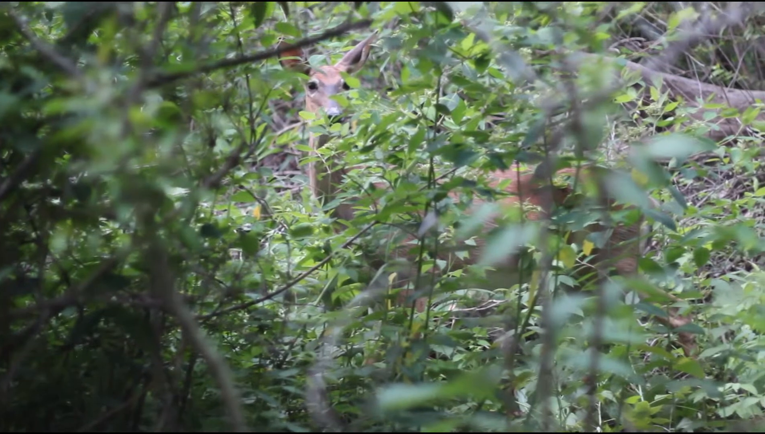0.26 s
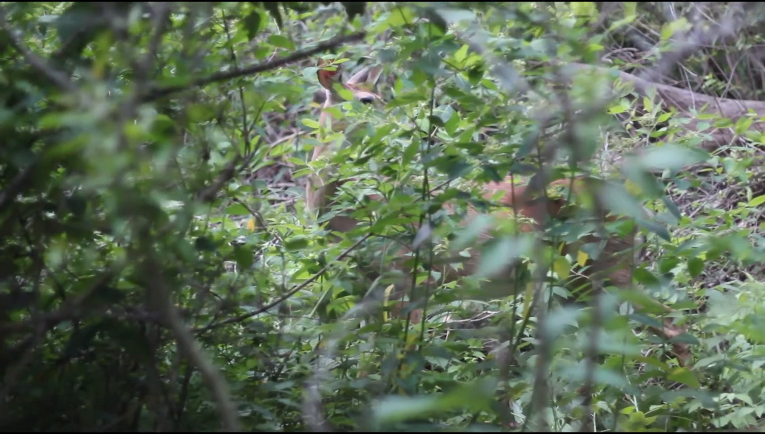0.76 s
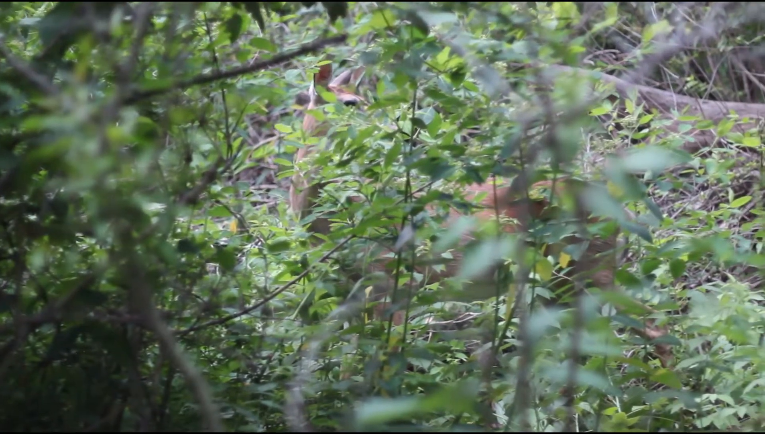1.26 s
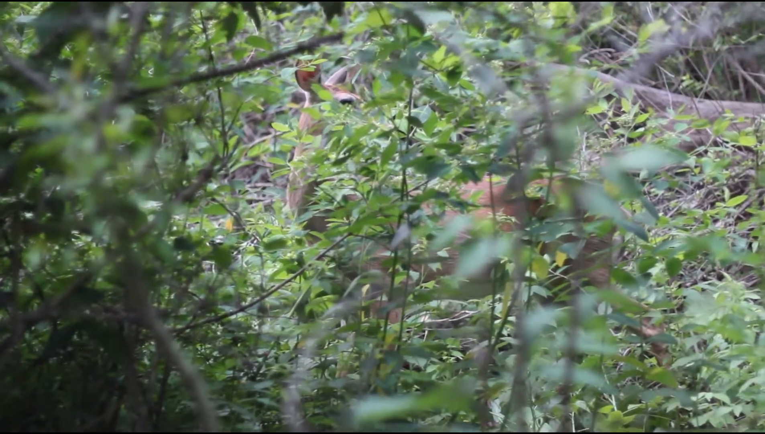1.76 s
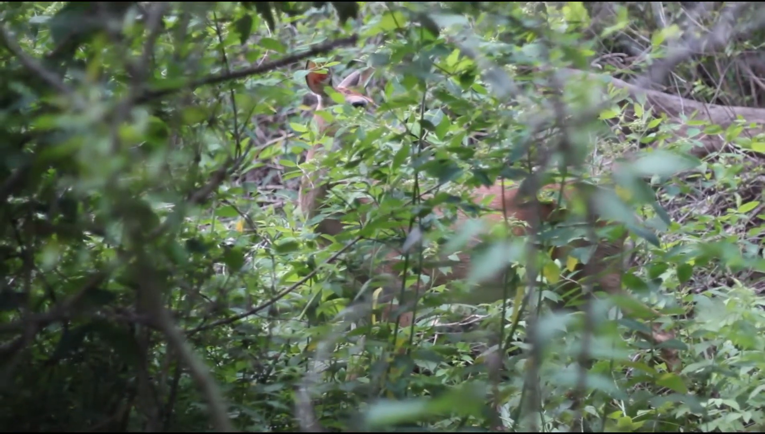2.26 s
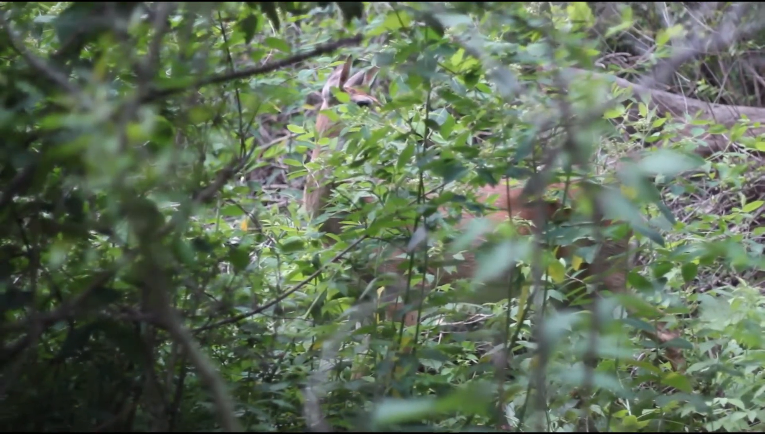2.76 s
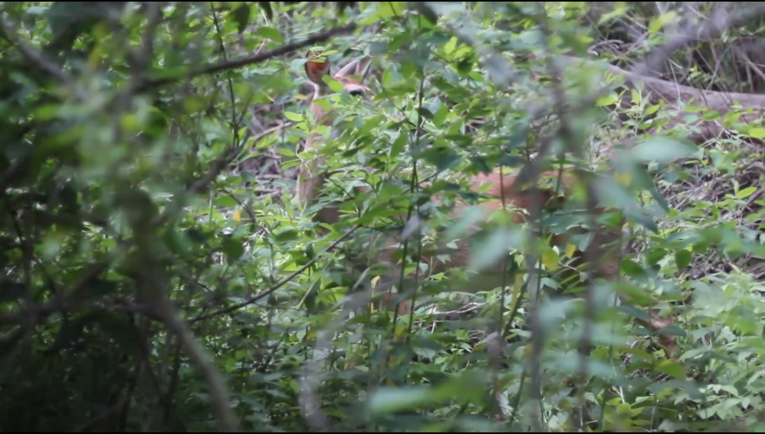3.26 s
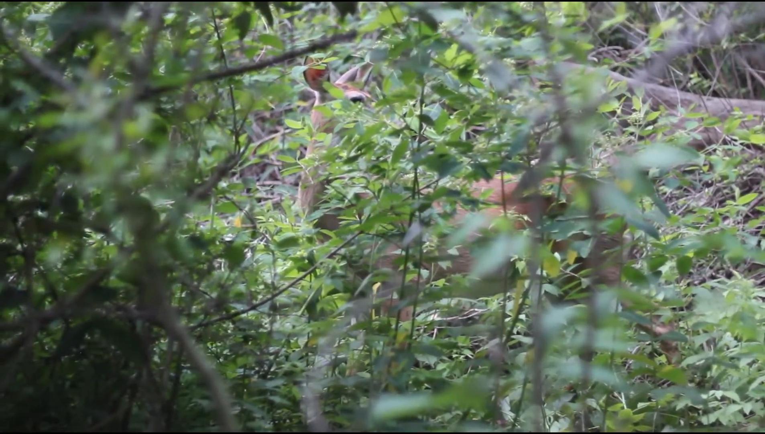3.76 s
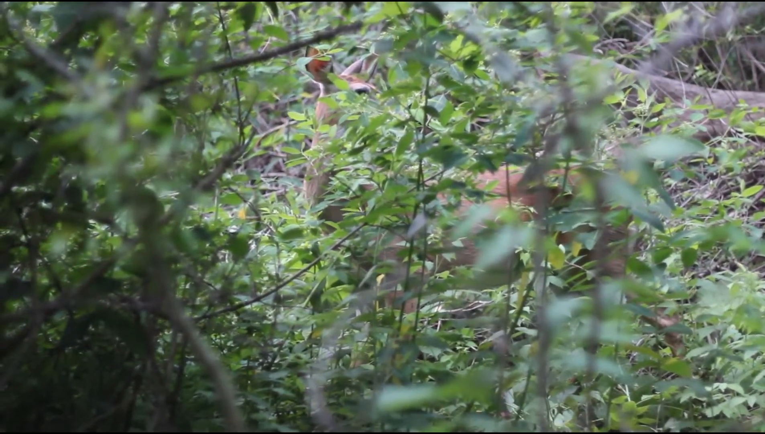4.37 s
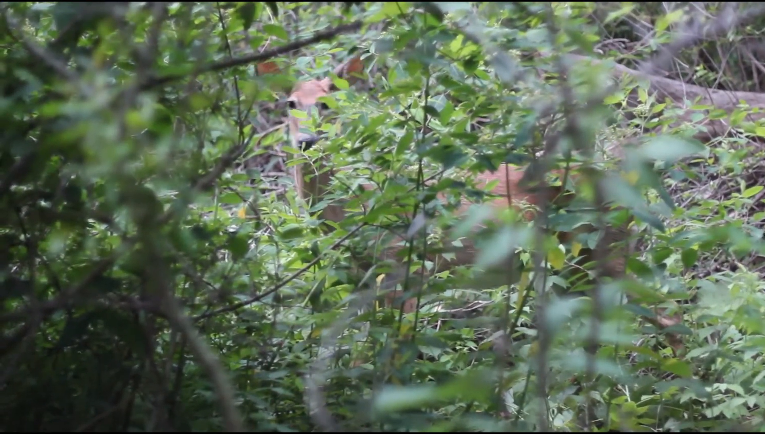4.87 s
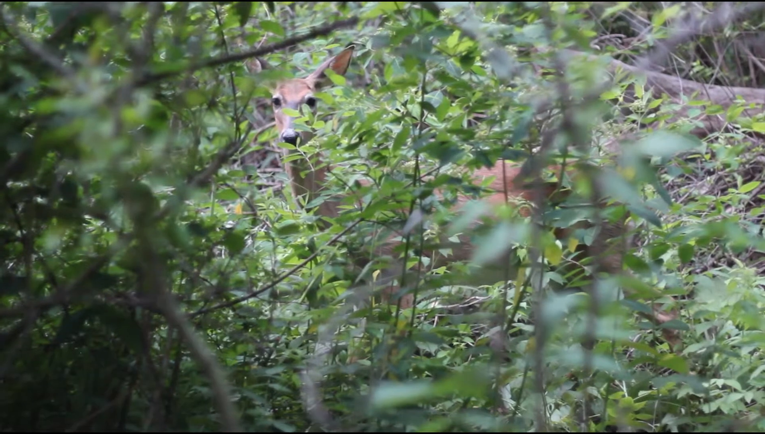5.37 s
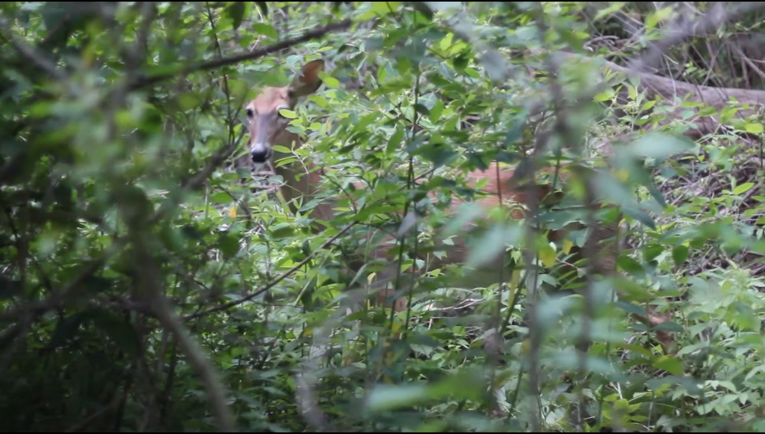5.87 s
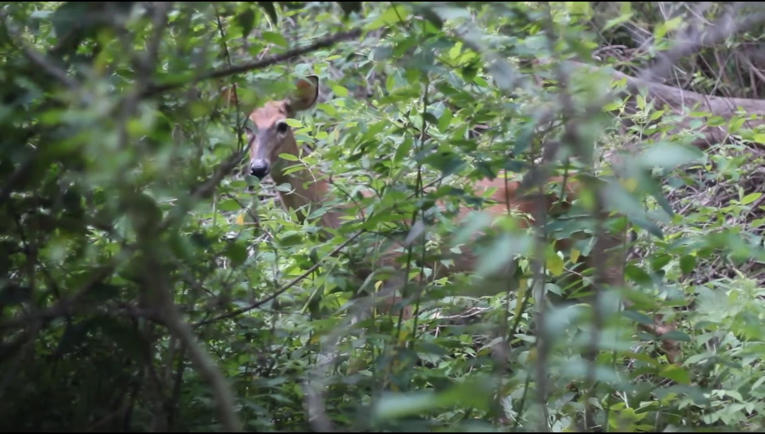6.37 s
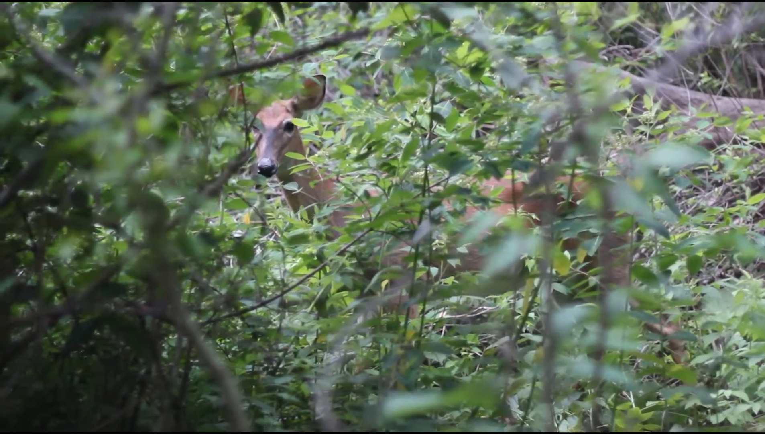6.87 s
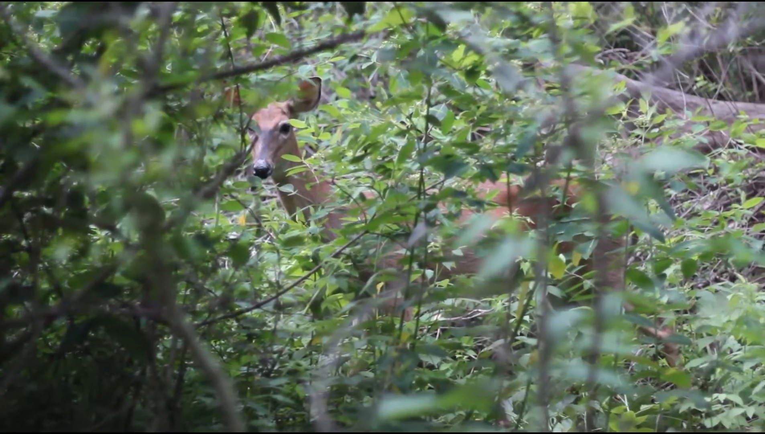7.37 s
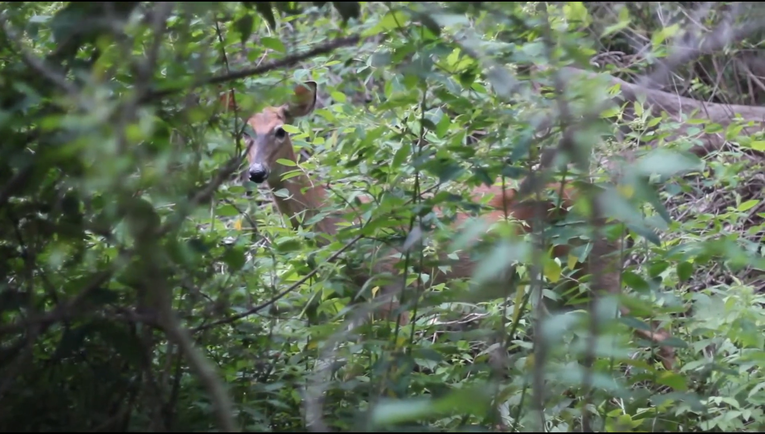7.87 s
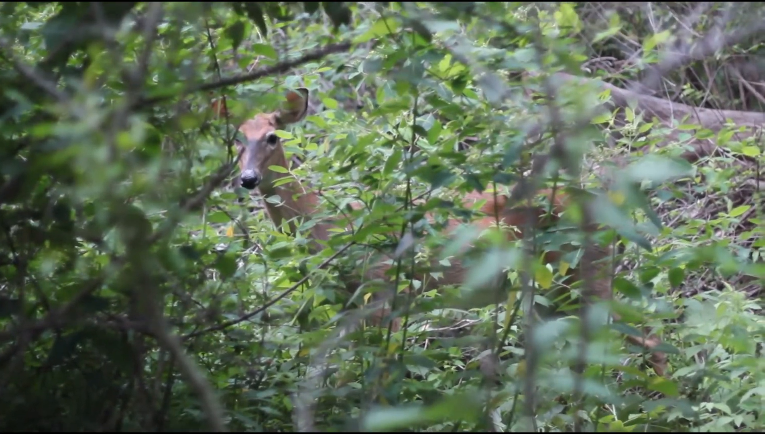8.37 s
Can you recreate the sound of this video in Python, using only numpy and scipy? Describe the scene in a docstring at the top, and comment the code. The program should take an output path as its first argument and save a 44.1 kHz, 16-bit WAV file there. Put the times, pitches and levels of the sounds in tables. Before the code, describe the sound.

In a wood, heard in stereo over a constant hiss, birds call with quick whistled notes and longer, slightly raspy trills. A few tiny twig ticks and a very faint dove coo lie under the first half. One bird mews at the busiest point and again later. After a short lull the song returns more quietly, while leaves rustle softly and a far vehicle adds a faint rush.

```python
"""Birds in a leafy wood

Songbirds whistle rising notes and buzzy trills, with breath rasping in their throats. One bird mews
through a stack of overtones and a dove coos far off; trunks and leaves scatter their voices. Behind
them lie a far chorus, rustling leaves, twig ticks, hiss, faint hum, a low rumble and a distant vehicle
that draws near. We listen through two crossed microphones."""
import sys
import numpy as np
from scipy import signal
from scipy.fft import rfft, irfft, next_fast_len
from scipy.io import wavfile

SR = 44100
rng = np.random.default_rng(int(sys.argv[2]) if len(sys.argv) > 2 else 0)


def persist_wave(psi):
    """Save psi, clipped to +-1, as 16-bit WAV."""
    counts = np.round(np.clip(psi, -1, 1) * 32767).astype(np.int16)
    wavfile.write(sys.argv[1], SR, np.atleast_2d(counts).T)


N = 379681

# The tone colour of each noise. Each row: frequency in Hz, relative level in dB.
HISS_SPECTRUM = [(15, -57), (40, -27), (75, -38), (110, -25), (170, -22.5), (330, -18), (550, -9.5),
                 (1400, -10), (2200, -9), (5000, -5.5), (10000, -5.5), (15600, -11.5)]
RUMBLE_SPECTRUM = [(20, -24), (45, -17), (70, -12.5), (110, -23.5), (160, -2.5), (260, -2),
                   (400, -13.5), (800, -54)]
VEHICLE_SPECTRUM = [(30, -58), (100, -53), (250, -21.5), (450, -4.5), (700, 3), (1050, 1.5), (1400, -5),
                    (2000, -13), (6000, -46)]
LEAVES_SPECTRUM = [(200, -63), (1500, -29), (4000, -9), (7000, -2), (10000, 0.5), (13000, -3.5),
                   (16000, -43)]
CHORUS_SPECTRUM = [(400, -65), (1300, -16.5), (1800, -9), (2050, -3.5), (2400, -3.5), (3300, -3),
                   (4400, -7), (5500, -15), (8000, -31)]
LOW_RASP_SPECTRUM = [(600, -79), (1600, -13.5), (2000, -2), (2600, 1), (3600, 1), (4300, 2.5), (4900, -8),
                     (5600, -25), (9000, -52)]
HIGH_RASP_SPECTRUM = [(1000, -64), (4000, -17), (5000, -2), (6500, -3.5), (8000, -12.5), (9500, -32)]
# How the background sounds rise and fall. Each row: time in seconds, level in dB.
VEHICLE_LEVELS = [(0, -100), (.8, -78), (3.1, -70), (5.3, -67), (5.78, -58.5), (8.61, -59)]
LEAVES_LEVELS = [(0, -52), (.6, -53.5), (1.29, -61), (1.73, -56), (2.2, -57), (3.9, -61.5), (5.3, -81),
                 (5.6, -58), (6.7, -56.5), (8.61, -65)]
CHORUS_LEVELS = [(0, -51), (.6, -46.5), (1.7, -50.5), (2.3, -55.5), (3.4, -57.5), (4.7, -51.5), (5.1, -54),
                 (5.45, -58), (6.0, -59.5), (7.4, -57), (8.61, -57.5)]
# Twigs cracking. Each row: start in seconds, level in dB before filtering, centre pitch in Hz.
TWIG_TICKS = [(0.4075, -39, 9070), (0.4618, -38, 10600), (0.6374, -38, 9590), (1.533, -41, 8950),
              (1.5958, -41, 11200), (1.9455, -39, 10900), (2.001, -38, 8500), (2.0777, -39, 10700),
              (2.162, -43, 10300), (2.8549, -39, 9000), (3.0375, -40, 9480), (3.0584, -40, 9470),
              (3.495, -35.5, 8100), (3.9389, -42, 9000)]
# Coos and mews. Each row: start and length in seconds, first, halfway and last pitch in Hz, level in dB.
DOVE_COOS = [(.55, 0.62, 530, 546, 579, -79.5), (1.361, 0.099, 585, 583, 580, -71.5),
             (1.521, .5, 580, 585, 577, -71), (3.819, 0.81, 575, 581, 569, -71.5)]
MEW_CALLS = [(4.329, .39, 879, 842, 794, -57), (6.84, .375, 873, 856, 823, -57)]
# A mew's overtones. Each row: multiple of the pitch, relative dB while clear, relative dB once cracked.
MEW_OVERTONES = [(2, -17, -17), (3, 0, 1), (4, 3.5, -9), (5, -12, -12), (6, -9, -10), (7, 2, 0),
                 (8, 1.5, -1.5), (9, -11, -14), (10, -5, -8)]
# Breath under the song. Each row: start, swell time and hold time in seconds, level in dB,
# brightness in dB (more lifts the high part of the rasp).
RASP_PHRASES = [(.15, 0.11, 0.14, -66, -1), (.5, 0.36, .12, -46, 4), (1.12, 0.046, 0.047, -49.5, 3),
                (1.37, 0.049, 0.14, -47.5, -1), (2.07, 0.036, 0.018, -63, 9), (2.28, 0.092, 0.1, -55.5, 6),
                (2.64, 0.078, 0.038, -50, 0), (2.997, 0.064, 0.17, -58.5, 8.5),
                (3.684, 0.071, 0.25, -45, -4), (4.085, 0.13, 0.18, -41, 2.5),
                (6.095, 0.28, 0.62, -50.5, -11), (6.798, 0.18, 0.25, -48.5, 1.5),
                (8.098, 0.45, 0.043, -56.5, -2)]
# Songbird notes. Each row: start and length in seconds, first, halfway and last pitch in Hz, main level
# in dB, share of the length where that level falls, trill swing in Hz, direction in degrees to the left.
SONG_NOTES = [(0.254, 0.062, 2874, 2950, 2990, -46, 0.7, 90, 93),
              (0.398, 0.078, 3220, 3340, 3310, -51, 0.3, 60, 89),
              (0.403, 0.095, 2018, 2154, 2137, -45, 0.32, 0, 59),
              (0.624, 0.2, 2755, 2996, 3140, -50.5, 0.37, 246, 90),
              (0.816, 0.27, 3190, 3464, 3596, -44, 0.49, 607, 91),
              (1.109, 0.11, 3780, 4580, 4800, -52, 0.5, 89, 72.5),
              (1.167, 0.066, 2433, 2537, 2390, -47.5, 0.58, 0, -43),
              (0.84, 0.17, 5660, 5920, 6060, -53.5, 0.7, 220, 37),
              (1.436, 0.046, 2250, 2450, 2500, -50.5, 0.5, 150, -11),
              (1.468, 0.15, 2840, 3020, 3474, -47.5, 0.7, 180, 3),
              (1.588, 0.086, 1847, 2047, 2180, -52, 0.76, 30, 37),
              (1.83, 0.052, 2120, 2190, 2180, -55, 0.5, 30, 65),
              (1.85, 0.067, 5780, 5800, 5850, -59, 0.5, 35, 75),
              (2.099, 0.049, 3860, 3920, 3900, -57.5, 0.5, 60, 48),
              (2.358, 0.052, 2780, 2770, 2840, -59, 0.4, 40, 35),
              (2.39, 0.084, 4120, 4450, 4310, -52.5, 0.2, 297, 71),
              (2.43, 0.035, 2670, 2660, 2640, -62, 0.4, 40, 69),
              (2.692, 0.095, 2250, 2690, 2290, -54, 0.55, 10, -25),
              (2.798, 0.06, 3570, 3590, 3580, -59, 0.3, 60, 33),
              (3.036, 0.089, 2665, 2920, 3620, -56.5, 0.88, 102, 87),
              (3.105, 0.096, 3950, 4210, 3930, -50.5, 0.27, 128, 67),
              (3.229, 0.1, 4010, 4050, 4200, -57.5, 0.3, 452, 54),
              (3.521, 0.035, 3010, 3030, 3520, -50, 0.28, 102, 94),
              (3.562, 0.072, 4150, 4204, 4260, -53.5, 0.5, 100, 59),
              (3.555, 0.11, 5530, 5750, 5700, -56.5, 0.15, 250, 84),
              (3.607, 0.041, 3730, 3720, 3550, -51, 0.4, 176, 95),
              (3.729, 0.045, 4140, 4070, 3900, -58, 0.5, 150, 52),
              (3.879, 0.14, 4450, 5400, 5300, -51.5, 0.56, 344, -4),
              (3.91, 0.1, 1720, 1973, 2260, -50.5, 0.9, 28, 52),
              (4.044, 0.057, 4080, 4130, 4100, -52.5, 0.5, 48, 54),
              (4.128, 0.16, 2410, 3060, 3330, -42.5, 0.68, 294, 83),
              (4.301, 0.26, 3460, 3606, 3660, -45, 0.86, 800, 47),
              (4.779, 0.7, 2060, 2050, 2084, -58, 0.1, 160, 57),
              (6.064, 0.052, 2950, 2970, 3090, -54, 0.36, 80, 94),
              (6.148, 0.032, 3260, 3900, 4100, -51.5, 0.46, 250, 85),
              (6.175, 0.088, 2595, 2970, 3170, -54.5, 0.7, 150, 90),
              (6.23, 0.094, 4200, 4390, 4340, -55.5, 0.4, 60, 61),
              (6.244, 0.19, 2345, 2600, 3315, -52, 1, 150, 86),
              (6.45, 0.82, 4145, 4170, 4080, -56, 0.23, 520, 66),
              (6.997, 0.21, 2150, 2130, 2220, -64, 0.55, 150, 56),
              (7.384, 0.17, 3220, 3600, 4220, -58.5, 0.66, 299, 83),
              (7.953, 0.019, 7200, 6350, 5540, -56, 0.6, 0, -53),
              (8.018, 0.015, 7030, 6250, 5540, -54, 0.6, 0, 52),
              (8.08, 0.019, 6800, 6000, 5240, -56, 0.7, 0, 74),
              (8.143, 0.014, 7100, 6150, 5230, -58, 0.8, 0, 57),
              (8.077, 0.21, 2062, 2150, 2180, -57, 0.1, 38, 70),
              (8.122, 0.11, 2540, 2800, 3020, -55, 0.98, 220, -77),
              (8.268, 0.093, 2750, 2890, 2930, -56, 0.55, 254, 97),
              (8.36, 0.079, 2505, 2610, 2730, -55, 0.5, 202, 82),
              (8.455, 0.023, 4090, 3570, 3270, -54.5, 0.5, 120, 60)]
# Winding calls. Each row: direction in degrees to the left, random share of the trill, a list of points.
# Each point: time in seconds, pitch in Hz, level in dB, trill swing in Hz.
SONG_CALLS = [(67, .3, [(.27, 1350, -52, 60), (.315, 1800, -51, 100), (.335, 2200, -46, 130),
              (.37, 2650, -44, 130), (.39, 2900, -43, 130), (.405, 3200, -49, 80)]),
              (52, .2, [(.665, 1580, -49, 30), (.75, 1800, -47, 60), (.83, 1960, -43.5, 100),
              (.89, 2060, -39.5, 140), (.94, 2090, -39, 170), (1.045, 2170, -39.5, 200),
              (1.062, 2180, -43, 200)]), (12, .3, [(3.725, 1250, -58, 40), (3.77, 1700, -56, 60),
              (3.805, 2150, -50, 100), (3.85, 2350, -44, 150), (3.9, 2550, -46, 170),
              (3.94, 2850, -42, 190), (3.97, 3200, -45, 100), (3.99, 3250, -52, 60)]),
              (47, .12, [(4.24, 1950, -48, 130), (4.29, 2080, -43.5, 180), (4.36, 2170, -43.5, 250),
              (4.45, 2340, -42, 320), (4.53, 2580, -42.5, 280), (4.58, 2650, -46, 240)]),
              (55, .4, [(1.42, 3900, -50, 60), (1.44, 4300, -50, 80), (1.465, 4620, -51, 100),
              (1.51, 4600, -54, 100)]), (7, .65, [(6.45, 3000, -59, 300), (6.62, 3080, -57, 300),
              (6.79, 3150, -52, 180), (6.85, 3100, -57, 300), (7.0, 3080, -53.5, 250),
              (7.09, 3100, -56, 300), (7.115, 3280, -50, 90), (7.2, 3200, -51.5, 120),
              (7.26, 3100, -56, 150)])]

TRILLS_PER_S = 72
THROAT_HZ = 1950   # small singers give out little sound below this
SIDE_LAG = 2   # samples by which the song reaches the left microphone later
TIME = np.arange(N) / SR


def amp(db):
    """Turns decibels into a gain to multiply by."""
    return 10 ** (np.asarray(db) / 20)


def unit_level(x):
    """Scales a signal so its average (rms) level is 1."""
    return x / np.sqrt(np.mean(x ** 2) + 1e-20)


def drift(rate_hz, size):
    """A smooth random wobble of about 1 either way; a higher rate wobbles faster."""
    pole = np.exp(-2 * np.pi * rate_hz / SR)
    smooth = signal.lfilter([1], [1, -2 * pole, pole * pole], rng.standard_normal(size + 4000))
    return unit_level(smooth[4000:])


def gain_curve(levels):
    """A gain that glides from one listed level to the next."""
    return amp(np.interp(TIME, *np.transpose(levels)))


def stereo(x, left_db, lag, right_gain):
    """One sound at both microphones, lag samples later on the left; a minus gain flips the right wave."""
    return np.array([amp(left_db / 2) * np.roll(x, lag), right_gain * amp(-left_db / 2) * x])


def shaped(white, spectrum):
    """Gives white noise a tone colour, at an average level of 1."""
    size = next_fast_len(N)
    hz, level_db = np.transpose(spectrum)
    bin_hz = np.fft.rfftfreq(size, 1 / SR) + 1
    gains = amp(np.interp(np.log(bin_hz), np.log(hz), level_db))
    return unit_level(irfft(rfft(white, size) * gains, size)[..., :N])


def stereo_noise(spectrum, alike, left_db, flicker_db, lag=3, right_gain=1):
    """Flickering noise; alike (0 to 1) sets how much of it the two sides share."""
    shared = stereo(rng.standard_normal(N), 0, lag, right_gain)
    own = rng.standard_normal((2, N))
    noise = shaped(np.sqrt(alike) * shared + np.sqrt(1 - alike) * own, spectrum)
    return noise * amp(flicker_db * drift(22, N)) * amp([[left_db / 2], [-left_db / 2]])


def note_shape(start, length, first_hz, halfway_hz, last_hz, main_db, main_at, start_db, end_db, fade_s):
    """A note's first sample, progress (0 to 1), arching pitch and gain; end levels add to main_db."""
    t = np.arange(round(length * SR)) / SR
    along = t / length
    level_db = main_db + np.interp(along, [0, np.clip(main_at, .02, .98), 1], [start_db, 0, end_db])
    fades = np.clip(np.minimum(t, length - t) / fade_s, 0, 1)
    arch_hz = halfway_hz - (first_hz + last_hz) / 2
    hz = first_hz + (last_hz - first_hz) * along + 4 * arch_hz * along * (1 - along)
    return round(start * SR), along, hz, amp(level_db) * fades * np.sqrt(2)


def microphone_noise():
    """The microphones' own hiss, and a faint hum picked up from mains power."""
    hiss = amp(-53) * stereo_noise(HISS_SPECTRUM, alike=.045, left_db=2.5, flicker_db=.73)
    hum = amp(-102) * np.sin(2 * np.pi * 60.4 * TIME) * [[1], [-1]]
    return hiss + hum


def rumble():
    """A low rumble, partly pushing the two microphones opposite ways."""
    noise = stereo_noise(RUMBLE_SPECTRUM, alike=.3, left_db=-1, flicker_db=.7, right_gain=-1.15)
    return amp(-79) * noise


def vehicle():
    """A distant rush on the left that grows as the vehicle draws near."""
    noise = stereo_noise(VEHICLE_SPECTRUM, alike=.61, left_db=6.5, flicker_db=.5)
    return gain_curve(VEHICLE_LEVELS) * noise


def leaves():
    """Leaves rustle: a bright noise that comes and goes."""
    noise = stereo_noise(LEAVES_SPECTRUM, alike=.028, left_db=-3, flicker_db=1.4)
    return gain_curve(LEAVES_LEVELS) * noise


def far_chorus():
    """Many far birds blur into one band of noise."""
    noise = stereo_noise(CHORUS_SPECTRUM, alike=.39, left_db=.6, flicker_db=.8, lag=0, right_gain=-1.16)
    return gain_curve(CHORUS_LEVELS) * noise


def twig_ticks():
    """Twigs crack: tiny bursts of bright noise, each around its own pitch."""
    out, size = np.zeros(N), 400
    decay = amp(-60 * TIME[:size] / .015)   # 60 dB down in 15 ms
    for start, level_db, hz in TWIG_TICKS:
        band = signal.butter(2, [.74 * hz, 1.26 * hz], "band", fs=SR, output="sos")
        first = round(start * SR)
        out[first:first + size] += amp(level_db) * signal.sosfilt(band, decay * rng.standard_normal(size))
    return out


def wood_echoes(voices, far_s=.78, near_s=.06):
    """Countless echoes off far trunks and leaves and near branches; each set drops 60 dB in its time."""
    t = np.arange(SR) / SR
    far = rng.standard_normal((2, SR)) * amp(-60 * t / far_s) * np.clip(t / .0082, 0, 1)
    near = rng.standard_normal((2, SR)) * amp(7 - 60 * t / near_s)
    echoes = signal.sosfilt(signal.butter(1, 6000, fs=SR, output="sos"), far + near)
    echoes /= np.sqrt(np.sum(echoes ** 2) / 2)
    return signal.fftconvolve(voices[None], echoes, axes=1)[:, :N]


def dove(gap_hz=47):
    """A soft coo: two low, wavering tones lie so close that they beat together and purr."""
    out = np.zeros(N)
    for row in DOVE_COOS:
        first, _, hz, gain = note_shape(*row, main_at=.4, start_db=-4, end_db=-7, fade_s=.016)
        size = len(hz)
        for offset_hz in (-gap_hz / 2, gap_hz / 2):
            phase = 2 * np.pi * np.cumsum(hz + offset_hz + 10 * drift(30, size)) / SR
            out[first:first + size] += gain * amp(2.5 * drift(6, size)) * np.sin(phase)
    return out


def mewing_bird():
    """A nasal, sinking stack of overtones without the lowest tone; clear at first, then cracked."""
    out = np.zeros(N)
    for start, length, *pitch_and_level in MEW_CALLS:
        first, along, hz, gain = note_shape(start, length, *pitch_and_level,
                                            main_at=.33, start_db=-6, end_db=-4, fade_s=.0038)
        size = len(hz)
        cracked = np.clip((along - .43) / .04, 0, 1)   # here the voice sags, roughens and rattles
        scoop_hz = 27.1 * np.exp(-along * length / .0255)   # slides up into the note
        wobble_hz = 2.5 * drift(20, size) + 7 * cracked * drift(150, size)
        phase = 2 * np.pi * np.cumsum(hz - scoop_hz - 8 * cracked + wobble_hz) / SR
        for multiple, clear_db, cracked_db in MEW_OVERTONES:
            level_db = clear_db + (cracked_db - clear_db) * cracked + 1.8 * drift(9, size)
            rattle = 1 + .28 * cracked * drift(70, size)
            out[first:first + size] += gain * rattle * amp(level_db) * np.sin(multiple * phase)
    return out


def breath_rasp(beats):
    """Breath rasps through the singers' throats, puffing on the trill beat; it swells, holds and dies."""
    low_power, high_power = np.zeros((2, N))
    for start, swell_s, hold_s, level_db, bright_db in RASP_PHRASES:
        rising_db = -13.5 * np.clip(1 - (TIME - start) / swell_s, 0, None)
        dying_db = -106 * np.clip(TIME - start - swell_s - hold_s, 0, None)
        power = amp(level_db + rising_db + dying_db) ** 2
        low_power += power
        high_power += power * amp(bright_db - 7) ** 2
    puffs = rng.standard_normal((2, N)) * (1 - .55 * np.cos(2 * np.pi * beats - .6))
    low = np.sqrt(low_power) * shaped(puffs[0], LOW_RASP_SPECTRUM)
    high = np.sqrt(high_power) * shaped(puffs[1], HIGH_RASP_SPECTRUM)
    return low + high


def melody(note_ragged=.55):
    """Each note and call as first sample, pitch, gain, trill swing, random share and direction."""
    for start, length, *pitch_and_level, main_at, swing_hz, degrees in SONG_NOTES:
        start_db = 2.5 - 44 * main_at * length   # longer notes start and end more quietly
        end_db = -2 - 27 * (1 - main_at) * length
        first, along, hz, gain = note_shape(start, length, *pitch_and_level,
                                            main_at, start_db, end_db, fade_s=.0028)
        widening = .55 + .45 * along
        yield first, hz, gain, swing_hz * widening, note_ragged, degrees
    for degrees, ragged, points in SONG_CALLS:
        times, hz, level_db, swing_hz = np.transpose(points)
        first = round(times[0] * SR)
        t = np.arange(first, round(times[-1] * SR)) / SR
        fades = np.clip(np.minimum(t - times[0], times[-1] - t) / .003, 0, 1)
        gain = np.sqrt(2) * fades * amp(np.interp(t, times, level_db))
        yield first, np.interp(t, times, hz), gain, np.interp(t, times, swing_hz), ragged, degrees


def songbirds(beats):
    """Almost pure whistles with a trill, given in stereo and also in mono to feed the echoes."""
    out = np.zeros((3, N))
    for first, hz, gain, swing_hz, ragged, degrees in melody():
        size = len(hz)
        beat = beats[first:first + size] % 1
        flick = 4 * beat ** 2 - 4 / 3   # in each beat the pitch lingers low, then flicks up
        trill = (1 - ragged) * flick + ragged * 1.2 * drift(244, size)
        pulse_depth = np.clip(.4 * swing_hz / 150, 0, .8) * (1 - ragged ** 2)
        pulse = 1 - pulse_depth * np.cos(2 * np.pi * beat - .3)
        # A husky roughness in the voice makes the level flutter.
        flutter = 1 + .17 * drift(50, size) + .35 * ragged * drift(200, size)
        phase = 2 * np.pi * np.cumsum(hz + swing_hz * trill + 30 * drift(57.6, size)) / SR
        whistle = np.sin(phase) + amp(-19) * np.sin(2 * phase)
        angle = np.radians(45 - degrees)   # the microphones point 45 degrees left and right
        pickup = [[np.sqrt(2) * np.cos(angle)], [np.sqrt(2) * np.sin(angle)], [1]]
        out[:, first:first + size] += pickup * (gain * pulse * flutter * whistle)
    throat = signal.butter(3, THROAT_HZ, "high", fs=SR, output="sos")
    left, right, mono = signal.sosfilt(throat, out + 1e-18)
    return np.array([np.roll(left, SIDE_LAG), right]), mono


def scene():
    """The birds, heard directly and as echoes, over the background."""
    beats = np.cumsum(TRILLS_PER_S * (1 + .05 * drift(22, N))) / SR   # running count of trill beats
    stereo_song, mono_song = songbirds(beats)
    breath, mew, coo = breath_rasp(beats), mewing_bird(), dove()
    direct = (stereo_song
              + stereo(amp(-6) * breath, left_db=3.5, lag=SIDE_LAG, right_gain=-1.06)
              + stereo(mew, left_db=-8.5, lag=0, right_gain=1)
              + stereo(coo, left_db=8, lag=3, right_gain=.48)
              + stereo(twig_ticks(), left_db=-13, lag=0, right_gain=.94))
    background = far_chorus() + leaves() + vehicle() + microphone_noise() + rumble()
    echoes = wood_echoes(mono_song + breath + amp(-6) * mew + amp(-2.5) * coo)
    return background + amp(-7.5) * echoes + direct


def record(dry):
    """Cuts away the highest treble, above 15700 Hz."""
    return signal.sosfilt(signal.ellip(12, .3, 70, 15700, fs=SR, output="sos"), dry)


dry = scene()
out = record(dry)
persist_wave(out)
```